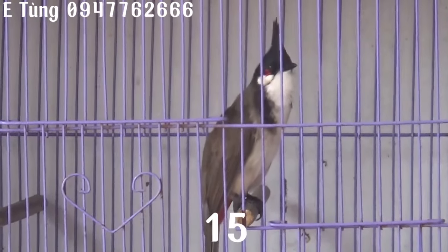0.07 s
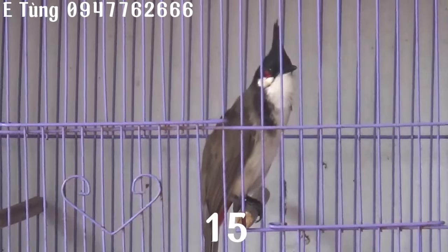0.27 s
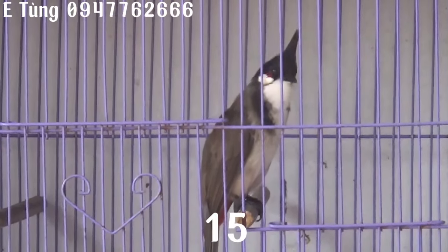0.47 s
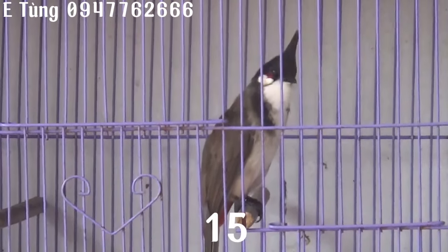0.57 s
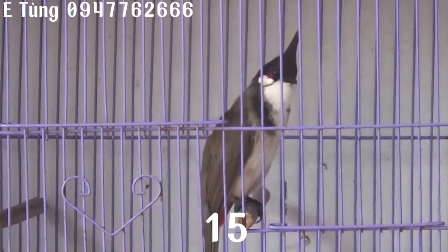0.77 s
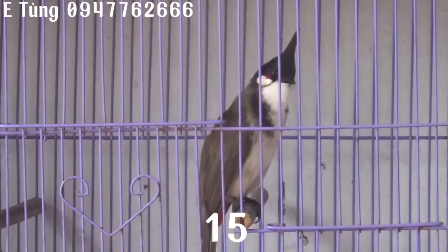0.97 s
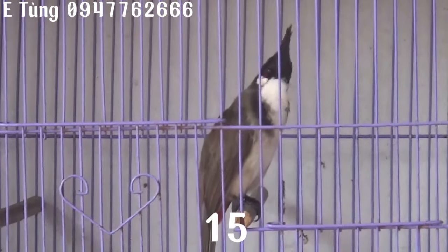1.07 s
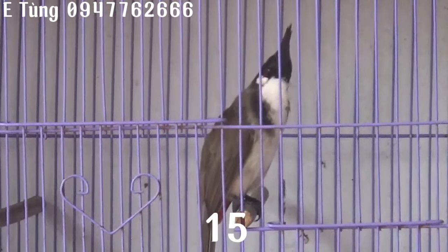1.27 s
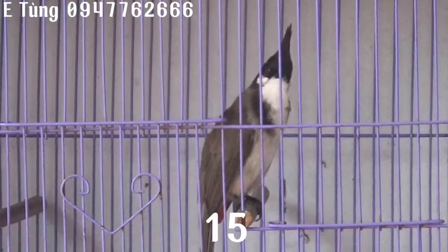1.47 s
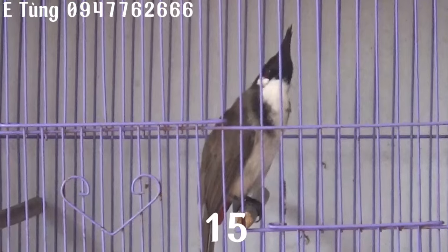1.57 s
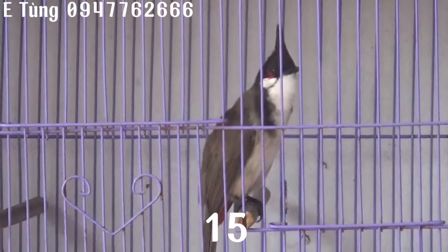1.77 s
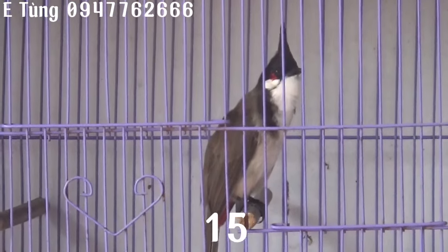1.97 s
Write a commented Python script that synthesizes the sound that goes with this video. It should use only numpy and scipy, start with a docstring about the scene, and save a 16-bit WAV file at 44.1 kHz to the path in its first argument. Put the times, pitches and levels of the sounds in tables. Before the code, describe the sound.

A caged songbird whistles a loud rapid warble, then a softer, raspier phrase in a hard room

```python
"""Caged bulbul in a hard-walled room

A loud warbled phrase, then a softer, partly raspy one: each syllable is a gliding whistle with weak
overtones or a hoarse note rich in them, smeared by wall echoes. There is also one thin, high squeak.
Small, mostly dry ticks of shaped noise fall in and between the phrases.
Underneath lie a slowly swelling low rumble and a steady hiss, both of filtered noise."""
import sys
import numpy as np
from scipy import signal
from scipy.fft import rfft, irfft
from scipy.io import wavfile
from scipy.ndimage import uniform_filter1d

SR = 44100
rng = np.random.default_rng(int(sys.argv[2]) if len(sys.argv) > 2 else 0)


def dump_mix(stems):
    """Bounce the given channels to the path in sys.argv[1] as a 16-bit WAV at rate SR."""
    frames = np.atleast_2d(stems).T  # one column per channel
    limited = np.clip(frames, -1, 1)  # hard clip at full scale
    pcm = np.round(limited * 32767).astype(np.int16)
    wavfile.write(sys.argv[1], SR, pcm)


N = 89346  # length in samples


def amp(db):
    """Turns decibels into gain."""
    return 10 ** (np.asarray(db) / 20)


def unit(x):
    """Scales to rms 1."""
    return x / np.sqrt(np.mean(x ** 2) + 1e-20)


def read(points, hz):
    """Reads a curve of (frequency, value) points on a log-frequency axis."""
    f, value = np.transpose(points)
    return np.interp(np.log(hz + 1), np.log(f + 1), value)


def add(mix, s, sound):
    """Adds a sound at s seconds to a track that starts one second early."""
    part = mix[round((s + 1) * SR):][:len(sound)]
    part += sound[:len(part)]


def wobble(size, rate_hz):
    """Smooth random motion: noise that fades out above rate_hz."""
    hz = np.fft.rfftfreq(SR, 1 / SR)
    smooth = rfft(rng.standard_normal(SR)) / (1 + (hz / rate_hz) ** 4)
    return unit(irfft(smooth, SR))[:size]


EDGE_S = 0.00055  # fade in and out of each syllable
TREMBLE_LIMIT = 1.61  # widest pitch swing, in multiples of the tremble


def syllable(points, tones, jitter, jitter_hz, flutter, breath_db):
    """The syrinx glides through the pitch points, trembling in pitch and strength."""
    s, hz, db = np.transpose(points)
    t = np.arange(s[0], max(s[-1], s[0] + 2 * EDGE_S), 1 / SR)

    swing = TREMBLE_LIMIT * np.tanh(wobble(len(t), jitter_hz) / TREMBLE_LIMIT)
    glide = uniform_filter1d(np.interp(t, s, hz), size=100)  # rounds the corners
    phase = 2 * np.pi * np.cumsum(glide * (1 + jitter * swing)) / SR
    tone = sum(amp(level) * np.sin(k * phase) for k, level in tones)

    air = amp(breath_db) * wobble(len(t), rate_hz=9000)
    voice = tone * (1 + flutter * wobble(len(t), jitter_hz)) + air

    to_edge = np.minimum(t - t[0], t[-1] - t)
    gate = np.sin(np.pi / 2 * np.clip(to_edge / EDGE_S, 0, 1)) ** 2
    return t[0], np.sqrt(2) * gate * amp(np.interp(t, s, db)) * voice


# Clear whistled syllables, one row each: (pitch tremble [share of pitch], overtone boost [dB],
# glide points (time [s], pitch [Hz], level before colour and mix [dB]))
WHISTLES = [ (0.035, 0, [(-.05, 3047, -12.5), (-.015, 3450, -25.5), (.011, 3645, -22.5)]),
            (0.028, -3, [(.014, 2000, -29), (.02, 2074, -24.5), (.023, 2730, -23), (.028, 2800, -18.5),
            (.032, 2200, -26), (.036, 2830, -21)]), (0.087, -2, [(.045, 3533, -28.5), (.056, 3033, -14.5),
            (.068, 2830, -23)]), (0.028, 2.5, [(.066, 2820, -10.5), (.078, 2630, -16.5), (.089, 2497, -15),
            (.092, 2590, -19)]), (0.031, 2.5, [(.091, 3170, -17), (.095, 3328, -15.5), (.102, 3230, -15.5),
            (.11, 2630, -13)]), (0.0757, 3, [(.203, 1964, -33), (.214, 2650, -21), (.217, 3110, -15.5),
            (.235, 3216, -13), (.249, 3495, -11), (.257, 3408, -15), (.268, 3305, -20)]),
            (0.082, -2, [(.318, 2543, -25), (.332, 2575, -21), (.35, 2570, -22)]),
            (0.0805, -2, [(.341, 3530, -20), (.349, 3273, -16), (.37, 3360, -19.5), (.382, 2920, -29)]),
            (0.025, -11, [(.384, 1825, -35), (.397, 1680, -34), (.409, 1490, -36)]),
            (0.051, -22, [(.417, 1810, -27.5), (.424, 2590, -23.5), (.438, 2735, -17.5)]),
            (0.0487, -3.5, [(.448, 3555, -23.5), (.459, 2778, -18.5), (.475, 2587, -17.5),
            (.496, 2492, -14.5), (.502, 3230, -16), (.51, 2680, -15), (.522, 2630, -28.5)]),
            (.02, -12, [(1.056, 2980, -35), (1.066, 2986, -36), (1.08, 2844, -42), (1.089, 2285, -31),
            (1.104, 2240, -39)]), (0.02, -15, [(1.168, 2898, -37), (1.18, 2917, -34.5), (1.19, 2900, -33),
            (1.2, 2256, -28.5), (1.217, 2286, -32.5)]), (0.069, 2, [(1.247, 2524, -53), (1.258, 2780, -22),
            (1.267, 2534, -31), (1.274, 2916, -30), (1.296, 2722, -31.5), (1.31, 2957, -32),
            (1.328, 3110, -35)]), (0.058, 13, [(1.382, 1688, -38), (1.405, 2195, -32), (1.416, 2393, -37),
            (1.425, 3100, -28), (1.431, 3180, -48)]), (0.026, 0, [(1.439, 3654, -22), (1.446, 3510, -26),
            (1.454, 3743, -19.5), (1.459, 3710, -24)]), (0.044, 13.5, [(1.457, 3020, -29),
            (1.462, 3130, -19.5), (1.467, 3220, -39)]), (0.022, -11, [(1.465, 3310, -21),
            (1.47, 3483, -20.5), (1.476, 3740, -20.5)]), (0.036, 9, [(1.531, 2485, -33), (1.558, 2417, -33),
            (1.57, 2360, -40)]), (0.048, 16, [(1.558, 2248, -41), (1.608, 2203, -40), (1.62, 2140, -42)]),
            (0.1025, -12, [(1.64, 2237, -51), (1.725, 2350, -45), (1.79, 2095, -50.5)]),
            (0.11, 3, [(1.935, 1553, -47), (1.96, 1763, -38), (1.98, 1692, -50), (2.005, 1950, -38)]),
            (0.027, -8, [(1.994, 2790, -53), (2.008, 2800, -36), (2.03, 2920, -56)])]
# Hoarse low notes, one list each: (time [s], pitch [Hz], level before colour and mix [dB])
RASPS = [
    [(-.01, 2000, -39), (.052, 1977, -64), (.075, 2010, -48)],
    [(.252, 2113, -50), (.263, 1902, -33.5), (.274, 1833, -39.5), (.3, 2040, -35)],
    [(.32, 2084, -48), (.35, 1937, -35.5), (.375, 1810, -41)],
    [(.65, 1745, -41), (.68, 1570, -47), (.705, 1400, -57)],
    [(1.066, 1665, -41), (1.08, 1667, -41.5), (1.1, 1666, -45.5)],
    [(1.162, 1751, -43), (1.195, 1653, -41), (1.24, 1590, -41)],
    [(1.258, 2047, -49), (1.3, 1876, -32), (1.335, 1908, -41)],
    [(1.525, 1074, -39.5), (1.555, 1128, -50), (1.605, 1579, -42.5)],
]
# Thin, very high squeak: (time [s], pitch [Hz], level before colour and mix [dB])
SQUEAK = [(1.57, 8000, -51), (1.675, 8000, -51), (1.685, 8100, -62)]
# Partials of a whistle before the overtone boost: (multiple of pitch [ratio], level [dB])
WHISTLE_TONES = [(1, 0.5), (2, -25), (3, -26.5), (4, -38.5)]
# Partials of a hoarse note: (multiple of pitch [ratio], level [dB])
RASP_TONES = [(1, 0), (1.5, 3), (2, -10), (3, -17), (4, -12), (5, -19), (6, -36)]
# Colour of the song through throat and beak: (frequency [Hz], gain [dB])
BEAK = [(400, -4), (800, 0), (1150, -6), (1900, -0.5), (3800, 1), (4250, -1.5), (5100, 1), (5900, -7),
        (7600, -3), (9000, -3.5), (10600, 4), (11200, -2), (11700, -38), (16000, -20)]


def bird():
    """Clear whistles, hoarse notes and a squeak, coloured by throat and beak, dull in the top treble."""
    song = np.zeros(N + SR)
    for tremble, boost_db, points in WHISTLES:
        tones = [(k, db + boost_db * (k > 1)) for k, db in WHISTLE_TONES]
        add(song, *syllable(points, tones, jitter=tremble, jitter_hz=448, flutter=0.16, breath_db=-25))
    for points in RASPS:
        note = syllable(points, RASP_TONES, jitter=0.1207, jitter_hz=490, flutter=0.78, breath_db=-13.5)
        add(song, *note)
    add(song, *syllable(SQUEAK, [(1, 0)], jitter=.009, jitter_hz=205, flutter=0.22, breath_db=-9))

    hz = np.fft.rfftfreq(len(song), 1 / SR)
    return irfft(rfft(song) * amp(read(BEAK, hz)), len(song))


# Snaps and scrapes: (time [s], starting level [dB], ring [Hz], decay time constant [s],
# strength of the bright ring against the main one [ratio])
TICKS = [(0.26, -32, 5000, 0.025, 0.16), (0.9895, -25.5, 5730, 0.0016, 1.24),
         (1.003, -30, 6450, 0.0013, 0.62), (1.004, -39, 2430, 0.0023, .05),
         (1.443, -33, 5000, 0.0048, 0.064), (1.716, -44, 6800, 0.0025, .4)]
TICK_TOP_HZ, TICK_WIDTH_HZ = 10500, 860  # centre of the bright ring, half-width of both rings


def ticks():
    """Tiny snaps and scrapes, as of a beak or claw: decaying noise with two resonances."""
    out, t = np.zeros(N + SR), np.arange(1024) / SR
    hz = np.fft.rfftfreq(len(t), 1 / SR)
    for s, db, ring_hz, decay, bright in TICKS:
        rings = ((ring_hz, 1), (TICK_TOP_HZ, bright))
        colour = sum(g / (1 + ((hz - f) / TICK_WIDTH_HZ) ** 2) for f, g in rings)
        noise = unit(irfft(rfft(rng.standard_normal(len(t))) * colour))
        add(out, s, amp(db) * np.exp(-t / decay) * noise)
    return out


SCATTER_START_S, SCATTER_DECAY_S = 0.0034, 0.013


def scatter():
    """A dense, quickly dying cluster of reflections from the cage and the wall behind it."""
    t = np.arange(SR) / SR
    taps = rng.standard_normal(SR) * (t > SCATTER_START_S) * np.exp(-t / SCATTER_DECAY_S)
    return taps / np.linalg.norm(taps)


# Reverberation time of the tail: (frequency [Hz], time to fall by 60 dB [s])
ROOM_T60 = [(500, 0.6), (2000, 0.69), (2700, 0.51), (3200, 0.45), (3800, 0.46), (6000, 0.57), (11000, 0.62)]


def tail():
    """Dense echoes of random sign and size, each band dying at its own rate."""
    build_up = np.clip(np.arange(SR) / SR / 0.018 - .5, 0, 1)  # silent to 9 ms, full from 27 ms
    taps = rng.standard_normal(SR) * (rng.random(SR) < .15) * build_up
    hz, t, z = signal.stft(taps, SR, nperseg=256)
    decay = amp(-60 * t / read(ROOM_T60, hz)[:, None])
    ring = signal.istft(z * decay, SR, nperseg=256)[1][:SR]
    return ring / np.linalg.norm(ring)


# Early reflections from near walls: (delay [s], gain before the wet level [ratio])
WALLS = [(.0031, 0.26), (.0062, 0.33), (0.0103, 0.28)]
TAIL_DB, SCATTER_DB = -1, -3  # before the wet level
ROOM_WIDTH = 0.061  # share of side signal in the echoes


def room(x, wet_db):
    """Direct sound, near walls, scatter and the tail, heard by two close microphones."""
    mid, side = (amp(TAIL_DB) * tail() + amp(SCATTER_DB) * scatter() for _ in range(2))
    for delay, gain in WALLS:
        mid[round(delay * SR)] += gain
    response = amp(wet_db) * np.array([mid + ROOM_WIDTH * side, mid - ROOM_WIDTH * side])
    response[:, 0] += 1  # direct sound
    return signal.fftconvolve(x[None], response, axes=1)[:, SR:SR + N]  # drops the early second


# Colour of rumble and hiss before the low cut: (frequency [Hz], relative spectral level [dB])
HISS = [(20, -40), (35, -9.5), (60, 4), (78, 2), (100, 1.5), (140, -5.5), (280, -5.5), (370, -16),
        (500, -14.5), (650, -20), (1300, -20.5), (2500, -27.5), (4500, -32), (10500, -33.5), (12000, -34),
        (13500, -27.5), (16000, -28)]
# Swell of the rumble alone: (time [s], gain [dB])
RUMBLE_SWELL = [(0, 0.5), (.2, -2), (.32, 1.5), (.7, 1.5), (0.899, 3), (1.1, -0.5), (1.32, 2), (1.7, 0.5),
                (1.998, 0.5)]
RUMBLE_LOW_HZ, RUMBLE_TOP_HZ = 45, 1170  # low cut of all the noise, top of the swelling part
FLOOR_DB = -36  # rms of rumble and hiss together, before the swell


def background():
    """A slowly swelling rumble and a steady hiss of coloured noise, nearly mono."""
    hz = np.fft.rfftfreq(N, 1 / SR)
    low_cut = hz ** 2 / np.hypot(hz ** 2, RUMBLE_LOW_HZ ** 2)
    mid, side = rfft(rng.standard_normal((2, N))) * amp(read(HISS, hz)) * low_cut
    # stereo width by frequency: (frequency [Hz], side gain [dB])
    side = side * amp(read([(60, -55), (300, -17.5), (9000, -40), (11500, -50)], hz))
    noise = amp(FLOOR_DB) * unit(irfft(np.array([mid + side, mid - side]), N))

    rumble = irfft(rfft(noise) / (1 + (hz / RUMBLE_TOP_HZ) ** 4), N)
    hiss = noise - rumble
    swell = amp(np.interp(np.arange(N) / SR, *np.transpose(RUMBLE_SWELL)))
    return hiss + rumble * swell


# Stereo place of the song: (time [s], left minus right [dB])
BIRD_PAN = [(.8, -2.9), (1.05, -.1), (2, -.6)]


def scene():
    """The bird, first a little right, then near the centre, and the ticks, over the background."""
    pan_db = np.interp(np.arange(N) / SR, *np.transpose(BIRD_PAN))
    song = room(bird(), wet_db=1.0) * amp(np.array([pan_db, -pan_db]) / 2)
    return amp(-5.5) * song + room(ticks(), wet_db=-17) + background()


def record(dry):
    """The recorder's band limit: a steep low-pass."""
    low_pass = signal.firwin(511, 15850, window=("kaiser", 9), fs=SR)  # cutoff in Hz
    return signal.oaconvolve(dry, low_pass[None], "same")


dry = scene()
out = record(dry)
dump_mix(out)
```